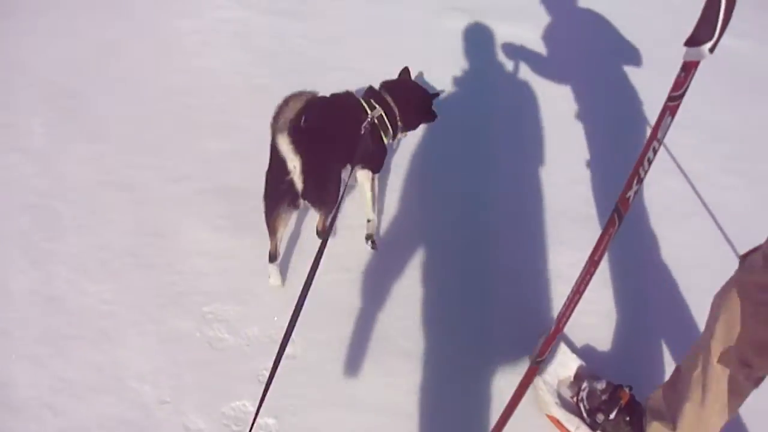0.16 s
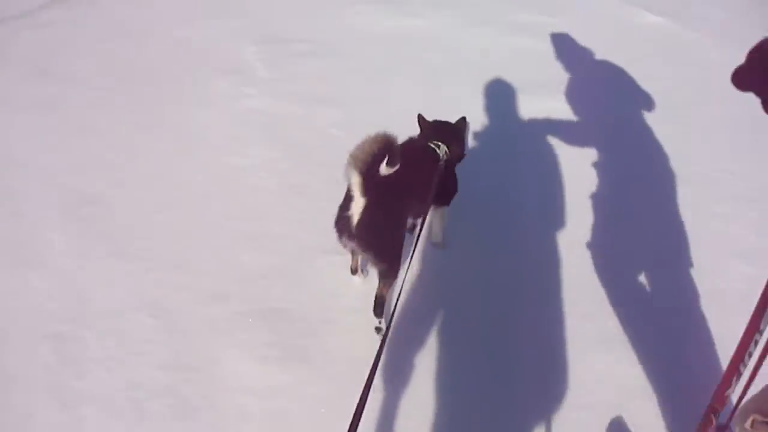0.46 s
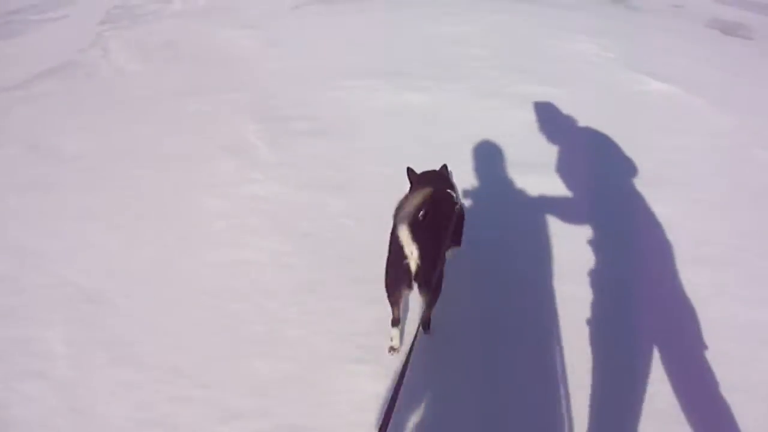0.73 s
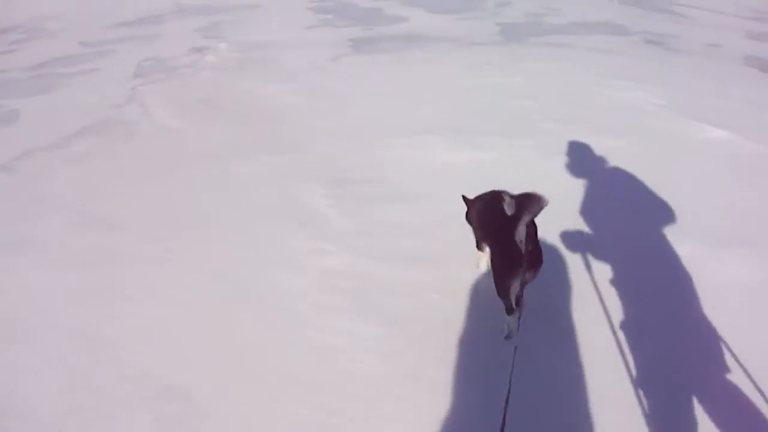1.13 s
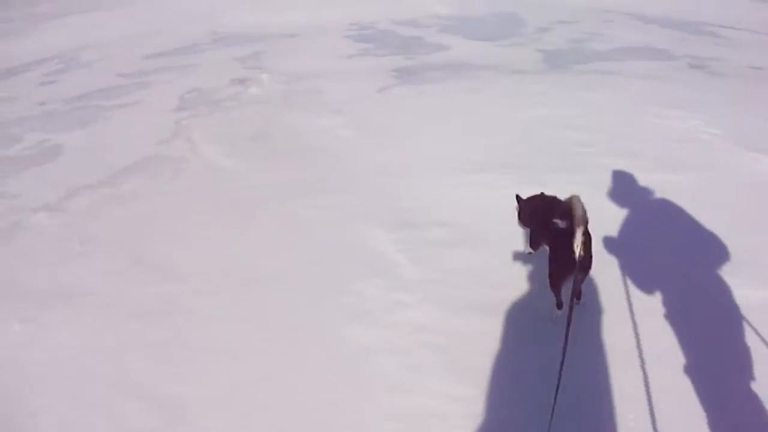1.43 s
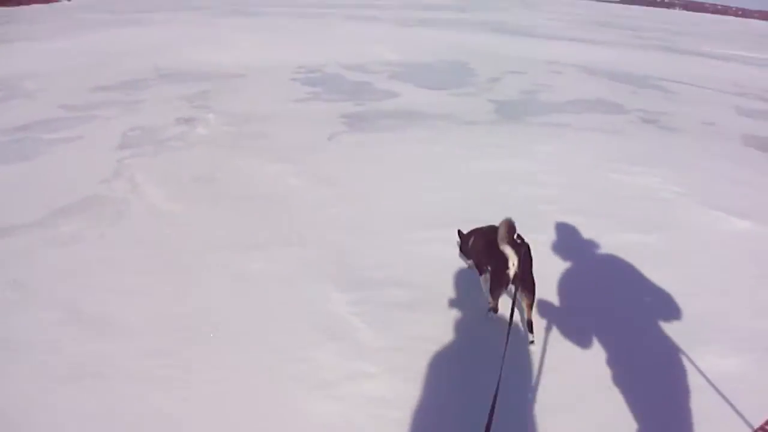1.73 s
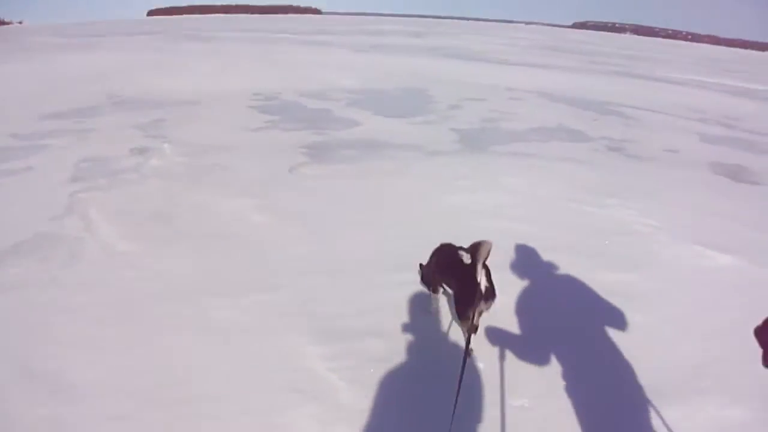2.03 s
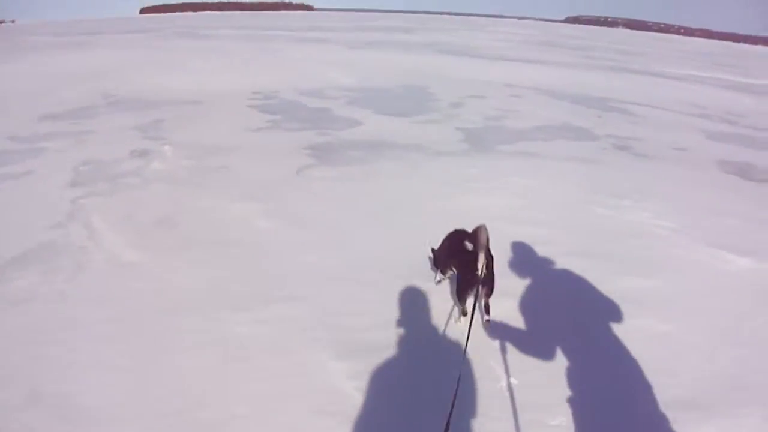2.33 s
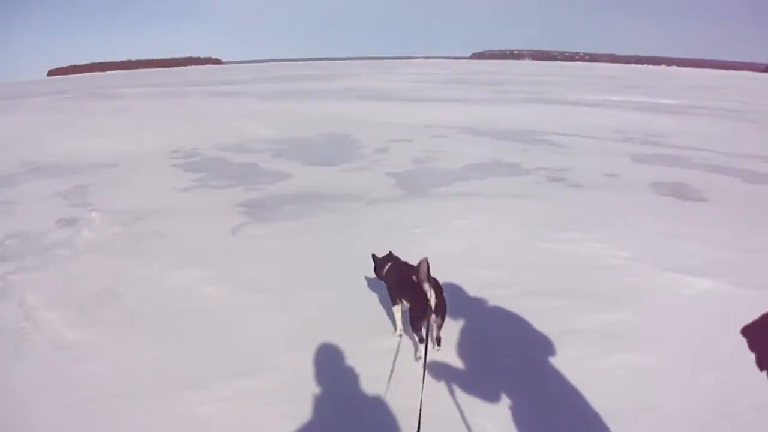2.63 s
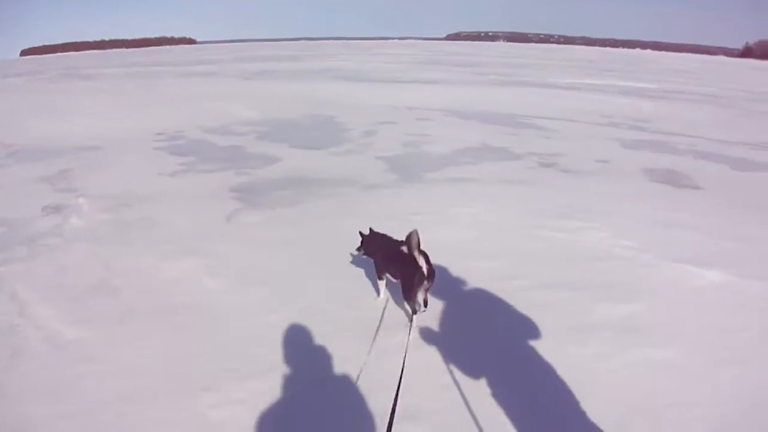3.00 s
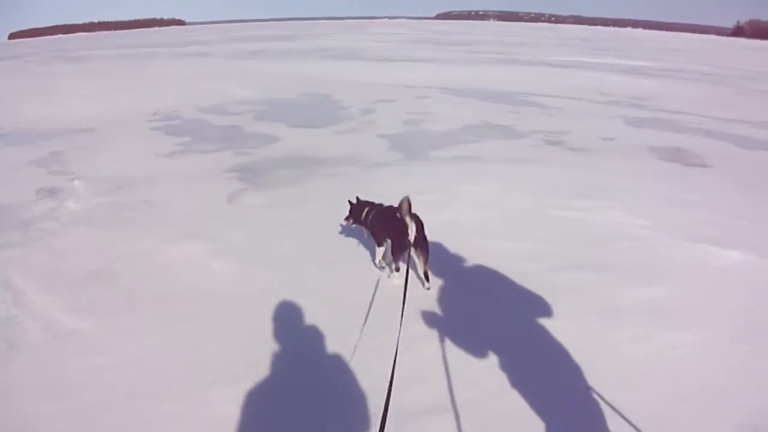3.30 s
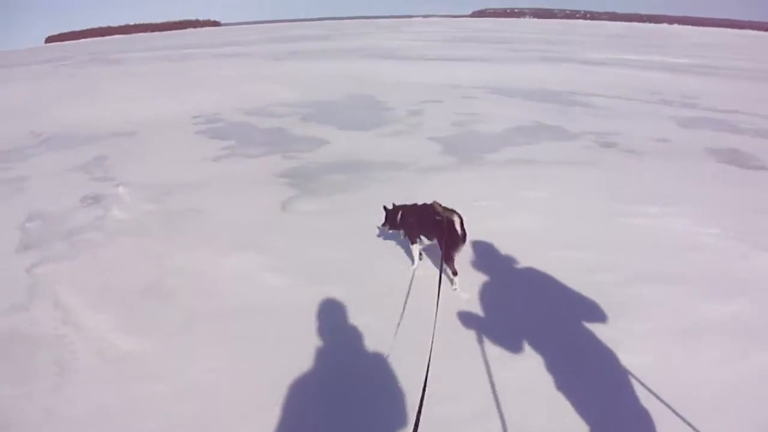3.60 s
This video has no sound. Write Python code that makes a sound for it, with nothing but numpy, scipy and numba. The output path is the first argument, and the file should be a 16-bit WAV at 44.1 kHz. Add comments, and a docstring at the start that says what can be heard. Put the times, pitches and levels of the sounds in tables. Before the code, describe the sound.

Boots break brittle snow crust close to a worn camera microphone: dense crunches at first, then separate heavier steps with light scuffs and short grinding rasps, dry open air and a very faint hiss.

```python
"""Boots and ski poles cross crusted snow on a frozen lake, heard from a camera worn by the walker.
Crunches are streams of tiny decaying fractures in quick clumps, shaped band by band by each step or scuff.
Slabs rasp and groan as moving resonances driven by friction noise; single plates snap as clustered rings
with splinter noise. Soft thuds are damped tones with rumble, a few metal clinks are high modes, and
a faint hiss is flickering noise. The open ice gives no echo."""
import sys
import numpy as np
from scipy import signal
from scipy.fft import rfft, irfft
from scipy.io import wavfile
from scipy.ndimage import uniform_filter1d
from numba import njit

SR = 44100
rng = np.random.default_rng(int(sys.argv[2]) if len(sys.argv) > 2 else 0)


def store_wav(level_fs):
    """Save 16-bit WAV to argv[1]."""
    pcm = np.round(np.clip(np.atleast_2d(level_fs), -1, 1) * 32767)
    wavfile.write(sys.argv[1], SR, pcm.T.astype(np.int16))


N = 165375  # 3.75 s
PEAK_WINDOW_S = .005  # reference length for the level of a short hit
THIN_HZ = 110  # breaking snow has no weight below this
PIVOT_HZ, BRIGHT_PER_OCTAVE = 1400, .45  # spectral tilt: pivot, dB/octave per dB of brightness
FINE_STOPS_FIRST = .25  # release exponent: fine fractures die sooner than coarse ones
SCUFF_HOLD_S, SAG_DB = .008, -1.5  # sag: the load eases over the hold
OWN_SHARE = .45  # exponent of each band's own clumps against the common ones
CLUMPS_PER_S, CLUMP_DECAY_S, CLUMP_SPREAD_DB, CLUMP_BED = 125, .004, 4.8, .6
RASP_WIDTH = .42  # width of each of two resonator passes over centre pitch
SNAP_T60_S, SPLINTER_T60_S, SPLINTER_DB, SNAP_TRIM_DB = .026, .02, -3, -.5
THUD_T60_S, RUMBLE_T60_S, THUD_RISE_S, KNOCK_TRIM_DB, RUMBLE_DB = .04, .07, .0022, -.5, -5
AIR_DB = -49
TOP_HZ = 10950


def undb(db):
    """Decibels to gain."""
    return 10 ** (np.asarray(db) / 20)


def unit(x):
    """Scale to rms 1."""
    return x / np.sqrt(np.mean(x ** 2))


def hit(x, db):
    """Scale a short sound to the energy of db held for the peak window."""
    return x * undb(db) * np.sqrt(PEAK_WINDOW_S * SR / np.sum(x ** 2))


def add(out, start_s, x):
    """Mix x into out at start_s."""
    i = int(np.clip(start_s * SR, 0, N - 1))
    out[i:i + len(x)] += x[:N - i]


def ring(t, hz, t60):
    """One exponentially dying sine mode."""
    return np.sin(2 * np.pi * hz * t) * decay(t, t60)


def decay(t, t60):
    """Exponential envelope, -60 dB at t60."""
    return np.exp(-np.log(1000) * t / t60)


def colour(x, points, size=2048):
    """Minimum-phase filter through (f/Hz, level/dB) points."""
    hz, db = np.array(points, float).T
    f = np.maximum(np.arange(size // 2 + 1) * SR / size, 1)
    cepstrum = irfft(np.log(undb(np.interp(np.log(f), np.log(hz), db))))
    cepstrum[1:size // 2] *= 2  # fold to causal
    cepstrum[size // 2 + 1:] = 0
    return signal.fftconvolve(x, irfft(np.exp(rfft(cepstrum))))[:len(x)]


def below(x, hz):
    """Zero-phase low-pass."""
    return signal.sosfiltfilt(signal.butter(2, min(hz, SR / 2 - 1), fs=SR, output="sos"), x)


def thin(x, hz):
    """Third-order high-pass."""
    return signal.sosfilt(signal.butter(3, hz, "high", fs=SR, output="sos"), x)


def grains(lo_hz, hi_hz, cycles, spread_db, count, size=400):
    """Stream of fractures, each ringing a few cycles at its own pitch and size; scaled by bandwidth."""
    pitch, rarity, sign, jitter = rng.random((count, 4)).T
    hz = (lo_hz + (hi_hz - lo_hz) * pitch)[:, None]
    size_db = -spread_db * np.log(np.maximum(rarity, np.exp(-4)))  # few large, many small
    strength = undb(size_db) * np.sign(sign - .5)
    waves = strength[:, None] * np.sqrt(hz) * ring(np.arange(size) / SR, hz, cycles / hz)
    starts = ((np.arange(count) + jitter) / count * N).astype(int)
    at = starts[:, None] + np.arange(size)
    stream = np.bincount(at.ravel(), waves.ravel())[:N]
    return unit(stream) * np.sqrt(2 * (hi_hz - lo_hz) / SR)


def clumps(count=1200):
    """Gain of crust giving way in fits: each starts at once and dies in a few milliseconds."""
    jitter, size = rng.random(count), rng.standard_normal(count)
    at = ((np.arange(count) + jitter) / CLUMPS_PER_S * SR).astype(int)
    inside = at < N
    kicks = np.zeros(N)
    kicks[at[inside]] = undb(CLUMP_SPREAD_DB * np.clip(size, -2, 2))[inside]
    fits = CLUMP_BED + signal.lfilter([1], [1, -np.exp(-1 / (CLUMP_DECAY_S * SR))], kicks)
    return fits / np.sqrt(uniform_filter1d(fits ** 2, size=2600))  # level the slow power


def step_gain(age, hz, attack, hold, release, db, bright_db):
    """Load of one step on one size class: linear rise, sagging hold, fall in dB."""
    fade = release * (PIVOT_HZ / hz) ** FINE_STOPS_FIRST
    tilt_db = bright_db * BRIGHT_PER_OCTAVE * np.log2(hz / PIVOT_HZ)
    sag_db = SAG_DB * np.clip((age - attack) / hold, 0, 1)
    fall_db = -20 * np.clip((age - attack - hold) / fade, 0, 10)
    return np.minimum(age / attack, 1) * undb(db + tilt_db + sag_db + fall_db)


def crunches():
    """Fractures follow the load of each step; each size class breaks partly with the others, partly alone."""
    # boot crushes crust: start/s, attack/s, hold/s, release to -20 dB at pivot/s,
    # level at pivot/dB, brightness/dB
    boot_steps = [ (0, .012, .11, .05, -27.5, 2), (.13, .11, .02, .05, -29, 3),
                  (.245, .048, .05, .05, -18, 1), (.423, .008, .061, .06, -18.5, 1.5),
                  (.51, .028, .035, .04, -23.5, 2), (.76, .017, .10, .09, -18, 1),
                  (.89, .025, .085, .05, -20, -.5), (1.014, .015, .08, .06, -19.5, 2),
                  (1.168, .029, .024, .04, -23, 2.5), (1.594, .003, .148, .025, -18, 2),
                  (1.745, .04, .09, .035, -20, -1.5), (1.875, .021, .19, .01, -23, -1),
                  (2.544, .003, .155, .03, -18.3, 1), (2.988, .004, .037, .04, -26, -1),
                  (3.254, .003, .28, .09, -19.5, .5), (3.562, .018, .17, .3, -27, 3)]
    # sole or pole tip scuffs: start/s, attack/s, release to -20 dB at pivot/s,
    # level at pivot/dB, brightness/dB
    brief_scuffs = [ (.722, .003, 0.1, -29.5, -5.5), (1.24, 0.017, .08, -28.5, -0.5),
                    (1.332, .015, .025, -20, 0.5), (1.524, .004, 0.05, -27, 1),
                    (1.546, .005, 0.01, -17, -1), (2.09, 0.019, 0.06, -29.5, 3),
                    (2.130, 0.0047, 0, -22, 2.5), (2.219, .012, .025, -29, 3),
                    (2.279, .012, 0.0142, -20, 3), (2.32, .03, 0.1, -41, 3),
                    (2.394, 0.0057, .015, -19.5, 1), (2.475, 0.036, 0.03, -20, -1),
                    (2.707, .04, 0.0149, -21, -4.5), (2.76, 0.017, .07, -33.5, 4),
                    (2.82, .043, 0.05, -29.5, 8), (2.88, 0.033, 0, -33, 3), (3.105, 0.019, 0.03, -40.5, 1),
                    (3.193, .024, .04, -25, 1)]
    # crust spectrum: f/Hz, level per Hz/dB
    crust_points = [(60, -34), (130, -23), (240, -11), (600, -3.3), (1050, -.5), (2200, -1.8), (4500, -10),
                    (7000, -15.5), (10800, -17.5)]
    scuffs = [(s, attack, SCUFF_HOLD_S, release, db, bright)
              for s, attack, release, db, bright in brief_scuffs]
    steps = list(boot_steps) + scuffs
    coarse = grains(102, 3180, cycles=16, spread_db=3.1, count=4800, size=1200)
    fine = grains(3180, 11500, cycles=30, spread_db=2.2, count=14000, size=300)
    dust = undb(-4) * rng.standard_normal(N)
    rest = unit(colour(coarse + fine + dust, crust_points))
    age = np.arange(SR // 2) / SR
    out, together = np.zeros(N), clumps()
    for hz in 350 * 2. ** np.arange(6):  # octave bands, split off from the bottom up
        band = below(rest, hz * np.sqrt(2)) if hz < SR / 4 else rest
        rest = rest - band
        power = np.zeros(N)
        for start, *shape in steps:
            add(power, start, step_gain(age, hz, *shape) ** 2)
        out += band * np.sqrt(power) * together ** (1 - OWN_SHARE) * clumps() ** OWN_SHARE
    return thin(out, THIN_HZ)


@njit
def resonate(x, hz, width):
    """State-variable band-pass whose centre moves; width is a share of the centre."""
    y = np.empty(len(x))
    b = l = 0.
    for i in range(len(x)):
        g = np.tan(np.pi * hz[i] / SR)
        v = (b + g * (x[i] - l)) / (1 + g * (g + width))
        b, l, y[i] = 2 * v - b, l + 2 * g * v, v
    return y


def rasps():
    """Sole grinds on a slab: fits of friction drive one gliding resonance that swells and dies."""
    # slab grinds: start/s, length/s, rms before swell/dB, first f/Hz, last f/Hz
    slab_grinds = [ (.325, .075, -28, 1000, 400), (.52, .045, -23, 3600, 3200), (.675, .075, -38, 220, 440),
                   (1.02, .105, -25, 900, 700), (1.785, .065, -19, 1020, 1200),
                   (1.945, .045, -27, 6400, 6200), (3.158, .082, -27, 190, 340),
                   (3.25, .065, -17, 950, 1100)]
    out, friction = np.zeros(N), rng.standard_normal(N) * clumps()
    for start, length, db, first_hz, last_hz in slab_grinds:
        hz = np.geomspace(first_hz, last_hz, int(length * SR))
        drive = friction[int(start * SR):][:len(hz)]
        slab = resonate(resonate(drive, hz, RASP_WIDTH), hz, RASP_WIDTH)
        swell = np.sqrt(np.hanning(len(hz)))
        add(out, start, undb(db) * swell * unit(slab))
    return out


def snaps(size=3000, count=5):
    """A crust plate breaks: a cluster of short rings and a spray of splinter noise."""
    # plate snaps: t/s, level before trim and high-pass/dB, main ring f/Hz
    plate_snaps = [ (.026, -19.5, 1900), (.052, -24, 1710), (.083, -19, 800), (.104, -13.5, 1750),
                   (.643, -34, 1490), (.719, -27, 850), (.776, -18.5, 1800), (.872, -18, 1890),
                   (.43, -17, 1410), (.968, -15.5, 2020), (1.001, -18, 1700), (1.659, -15, 1300),
                   (2.613, -17, 1350), (3.514, -19, 1500), (1.175, -26, 2820), (1.314, -29.5, 1800),
                   (1.347, -16.5, 750), (1.551, -18, 900), (1.495, -32, 1100), (1.580, -24, 1410),
                   (1.741, -17.5, 2000), (2.042, -21, 1610), (2.300, -18, 2120), (2.400, -18, 1900),
                   (1.793, -17, 1030), (2.524, -17, 1310), (2.696, -16.5, 1390), (2.703, -17, 1610),
                   (2.747, -17, 1200), (2.989, -13, 2200), (2.992, -20, 1200), (3.082, -29, 2020),
                   (3.095, -30, 1700), (3.257, -18, 1050), (3.277, -16.5, 1000), (3.607, -17.5, 1190),
                   (3.633, -22, 1600)]
    # splinter spectrum: f/Hz, level per Hz/dB
    splinter_points = [(120, -14), (450, -1), (2000, 0), (7000, -13)]
    out, t = np.zeros(N), np.arange(size) / SR
    for s, db, hz in plate_snaps:
        plate = ring(t, hz, SNAP_T60_S)
        for gain, detune in rng.standard_normal((count, 2)):
            plate += 0.49 * gain * ring(t, hz * np.exp(0.402 * detune), SNAP_T60_S)
        spray = colour(rng.standard_normal(size) * decay(t, SPLINTER_T60_S), splinter_points)
        add(out, s, hit(hit(plate, 0) + hit(spray, SPLINTER_DB), db + SNAP_TRIM_DB))
    return thin(out, 2 * THIN_HZ)


def thuds(size=6000):
    """Boot and clothing: dull, heavily damped knocks with a little low noise rumble."""
    # soft thuds: t/s, level before knock trim and rumble offset/dB, knock f/Hz
    soft_thuds = [(.032, -35, 400), (.722, -31, 190), (1.30, -38, 170), (1.728, -31, 260),
                  (2.724, -30, 220), (2.746, -23, 310), (2.776, -34, 150), (2.844, -27, 200),
                  (3.121, -27, 190), (3.146, -33, 150), (3.215, -22, 290), (3.736, -35, 170)]
    rumble_points = [(30, -24), (70, -2.5), (300, 0.5), (900, -23), (4000, -60)]  # f/Hz, level/dB
    out, t = np.zeros(N), np.arange(size) / SR
    for s, db, hz in soft_thuds:
        rumble = colour(rng.standard_normal(size) * decay(t, RUMBLE_T60_S), rumble_points)
        knock = ring(t, hz, THUD_T60_S) * (1 - np.exp(-t / THUD_RISE_S))
        add(out, s, hit(knock, db + KNOCK_TRIM_DB) + hit(rumble, db + RUMBLE_DB))
    return out


def clinks(size=5000):
    """Small metal parts touch and ring in a few high modes."""
    # gear contacts: t/s, level/dB
    gear_clinks = [(.07, -38), (.095, -33), (2.162, -27)]
    # modes of the metal: f/Hz, relative level/dB, t60/s
    metal_modes = [(8500, -9, .02), (10040, 1, .038), (10300, -6, .035)]
    out, t = np.zeros(N), np.arange(size) / SR
    metal = sum(undb(db) * ring(t, hz, t60) for hz, db, t60 in metal_modes)
    for s, db in gear_clinks:
        add(out, s, hit(metal, db))
    return out


def air():
    """Faint hiss under the steps: coloured noise with a quick, restless flicker."""
    # hiss spectrum: f/Hz, level per Hz/dB
    air_points = [(30, -24), (100, -7), (1000, 0), (10800, -15)]
    hiss = colour(rng.standard_normal(N), air_points)
    return undb(AIR_DB) * unit(hiss * clumps())


def scene():
    """All sources, close and dry, one channel."""
    return (crunches() + rasps() + snaps() + thuds() + clinks() + air())[None]


def record(dry):
    """The camera rounds the highest peaks and steeply cuts the top."""
    soft = np.tanh(1.226 * dry) / 1.177
    return signal.sosfilt(signal.ellip(10, .2, 70, TOP_HZ, fs=SR, output="sos"), soft)


dry = scene()
out = record(dry)
store_wav(out)
```